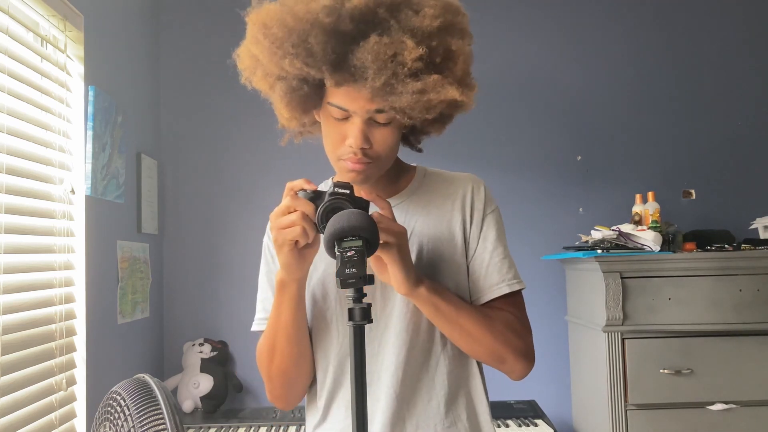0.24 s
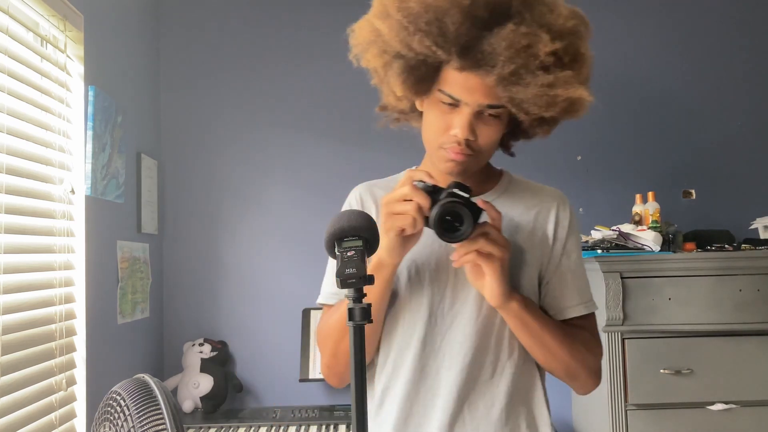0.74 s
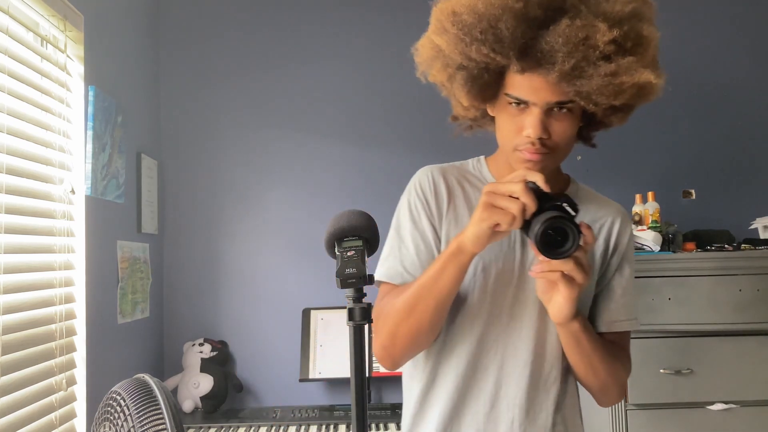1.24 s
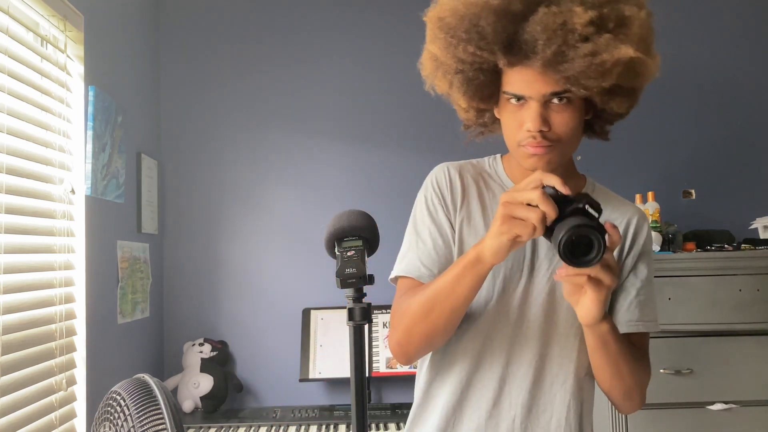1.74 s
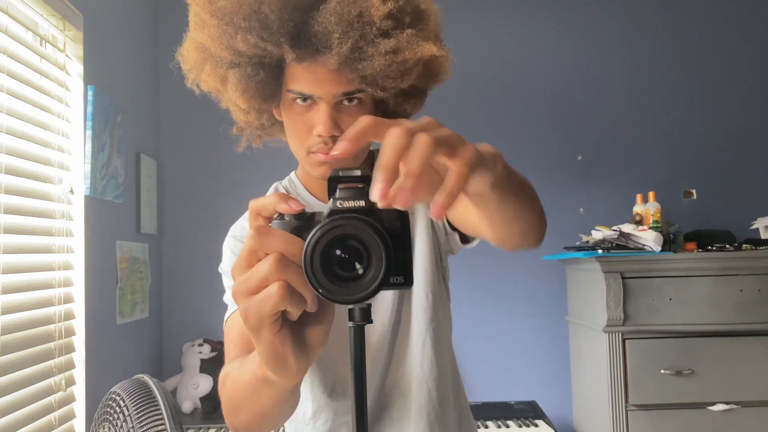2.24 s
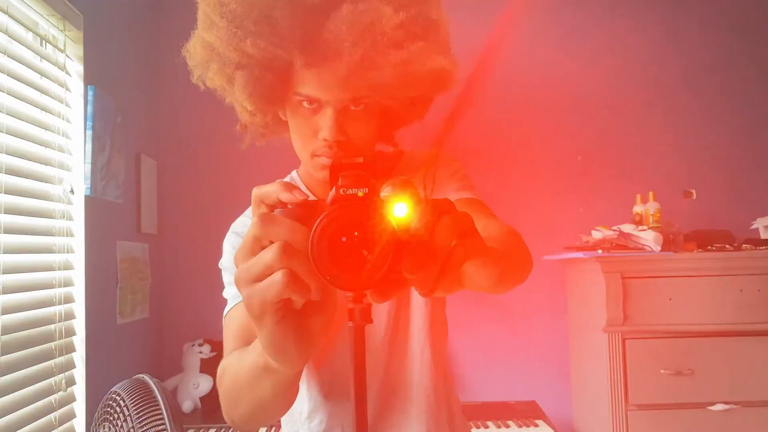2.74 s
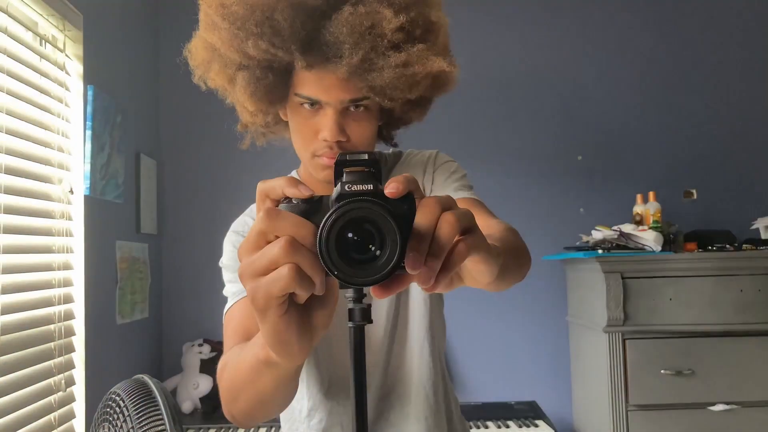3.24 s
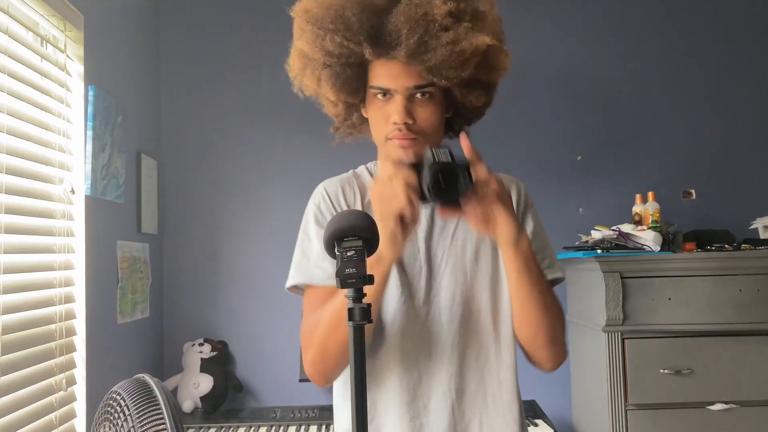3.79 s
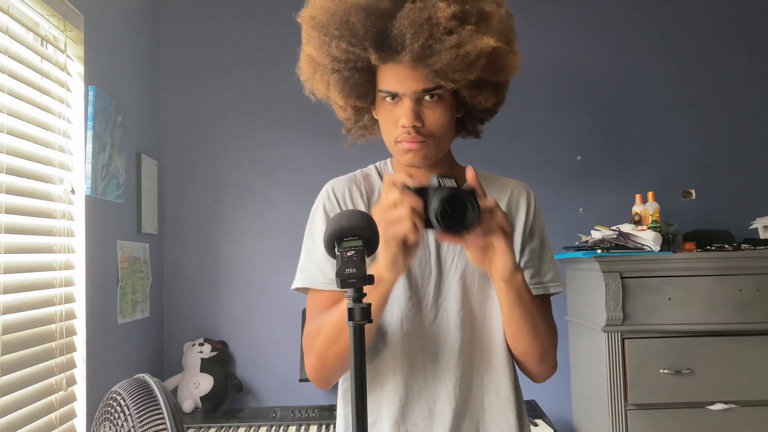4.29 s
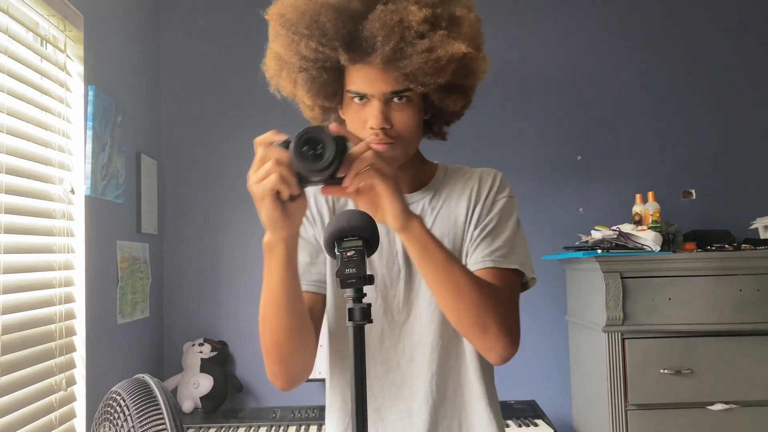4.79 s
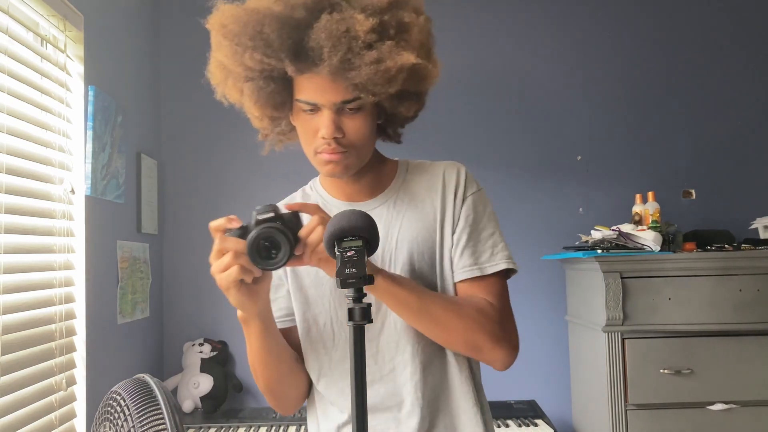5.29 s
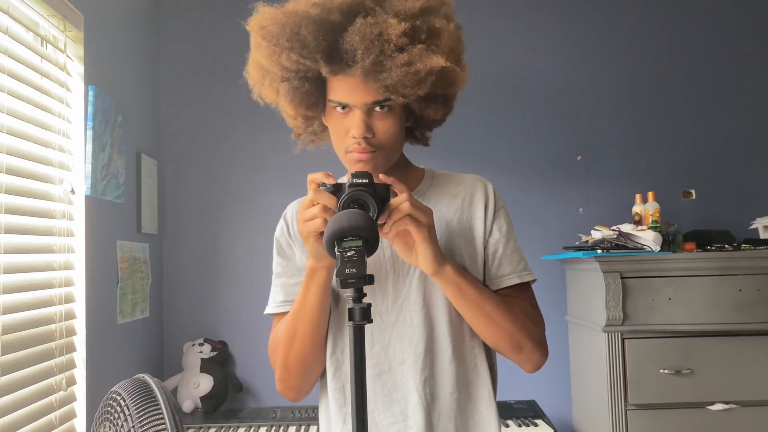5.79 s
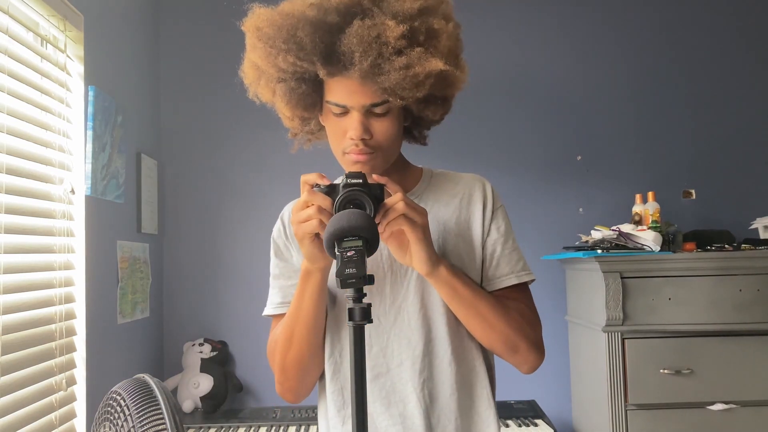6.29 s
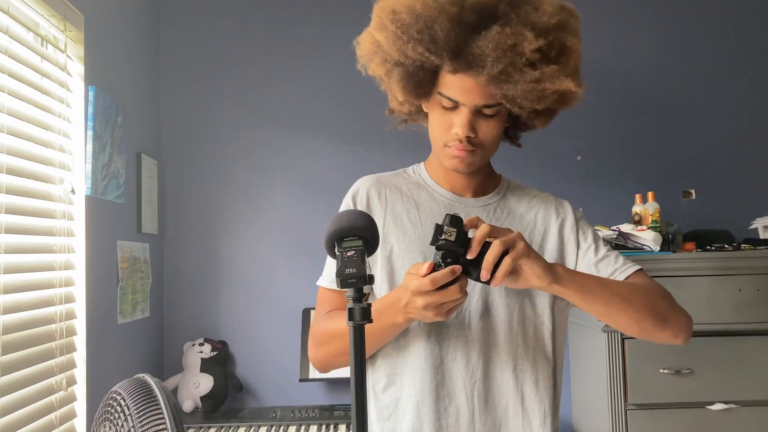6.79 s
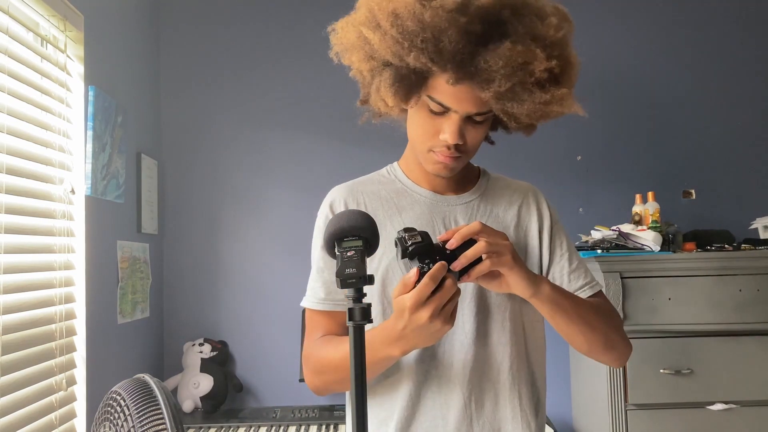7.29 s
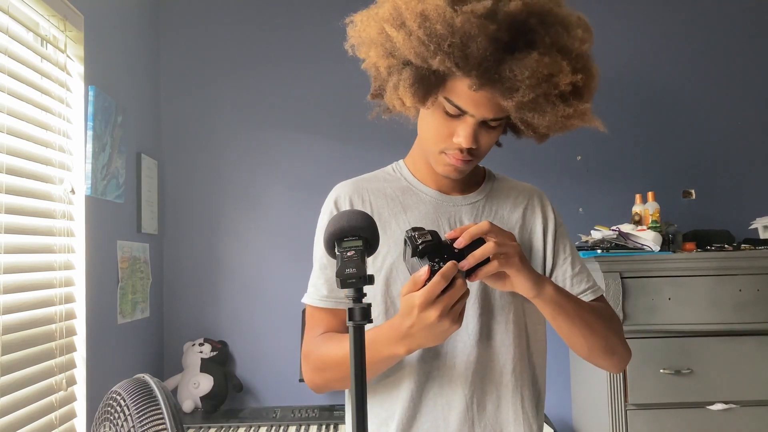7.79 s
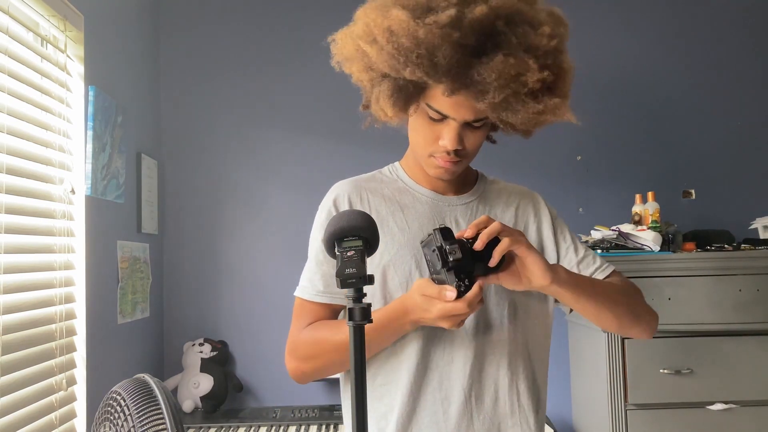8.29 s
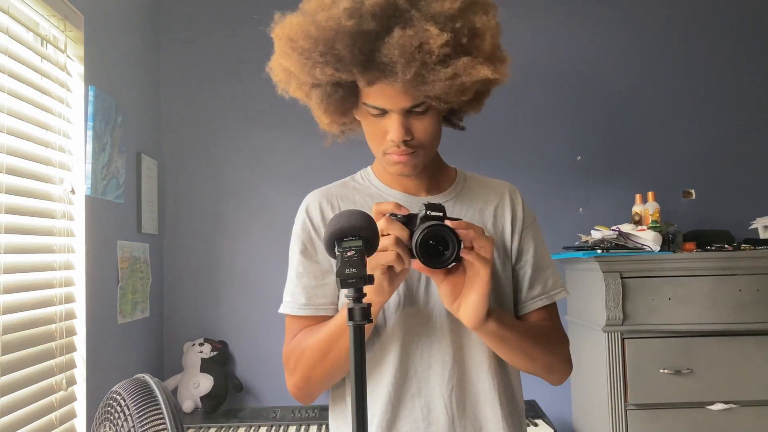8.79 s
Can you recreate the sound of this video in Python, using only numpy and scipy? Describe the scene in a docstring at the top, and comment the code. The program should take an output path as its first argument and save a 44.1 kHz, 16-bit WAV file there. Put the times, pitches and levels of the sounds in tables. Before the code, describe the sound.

Dry, bright shutter clacks come first loud and near, then softer and more distant, with light button ticks between them. After a small plastic clap, a rattling run of about sixteen frames passes very near the microphone. Several separate shots follow, then handling: clicking hinge, skin squeaks, hollow knocks and a hard clap with rebounds. A short burst ends it. The small room gives brief diffuse echo above soft air noise and faint cloth rustle.

```python
"""Small camera in a quiet bedroom

A small camera is fired near a microphone, in single shots and bursts of ten frames a second.
Each shot slams the shutter blades shut, a geared motor recocks them and a latch drops; then they snap open.
Impacts are decaying noise and struck modes, gears are modulated noise, and buttons and plastic are filtered
contacts. Fingers rub by stick-slip, sleeves rustle, a faint hum comes and goes, and the room echoes diffusely."""
import sys
import numpy as np
from scipy import signal
from scipy.fft import rfft, irfft, next_fast_len
from scipy.io import wavfile
from scipy.ndimage import map_coordinates

SR = 44100
rng = np.random.default_rng(int(sys.argv[2]) if len(sys.argv) > 2 else 0)


def digitize_waveform(pressure):
    """Quantize a signal to 16-bit integers and store it at the path in sys.argv[1].

    Rows of a 2-D input are taken as channels; values are limited to [-1, 1].
    """
    field = np.atleast_2d(pressure).T
    bounded = np.clip(field, -1, 1)
    quanta = np.round(bounded * 32767).astype(np.int16)
    wavfile.write(sys.argv[1], SR, quanta)


N = 398663
T = np.arange(SR // 8) / SR  # time within one short sound, seconds


def amp(db):
    """Level law: decibels to an amplitude ratio."""
    return 10 ** (np.asarray(db) / 20)


def unit(x):
    """Normalisation: scales to a root-mean-square of 1."""
    return x / np.sqrt(np.mean(x ** 2) + 1e-20)


def along(points, hz):
    """Logarithmic frequency scale: interpolates (Hz, value) points on it."""
    point_hz, values = np.transpose(points)
    return np.interp(np.log(hz + 1), np.log(point_hz + 1), values)


def wobble(rate, size):
    """Slow random modulation: a smooth curve through random knots, rate of them a second."""
    knots = rng.standard_normal(size // 8)
    return map_coordinates(knots, [np.arange(size) * rate / SR], mode="mirror")


def noise(alike, size):
    """Partial coherence: mid and side noise mixed so the channels have a given likeness by frequency."""
    likeness = along(alike, np.fft.rfftfreq(size, 1 / SR))
    turn = np.arccos(np.clip(likeness, -1, 1)) / 2
    mid_side = rfft(rng.standard_normal((2, size)))
    mid, side = irfft(mid_side * [np.cos(turn), np.sin(turn)], size)
    return np.array([mid + side, mid - side])


def coloured(x, spectrum, treble_db=0, keep_power=True):
    """Minimum-phase filtering: a causal filter of the given spectrum, tilted by treble_db."""
    size = 2 * next_fast_len(x.shape[-1] // 2 + 1024)
    hz = np.fft.rfftfreq(size, 1 / SR)
    tilt = along([(2500, -.5), (10000, .5)], hz)
    gain = amp(along(spectrum, hz) + treble_db * tilt)
    if keep_power:
        gain = unit(gain)
    # folding the cepstrum onto positive time makes the filter causal
    cepstrum = irfft(np.log(gain + 1e-6))
    cepstrum[1:size // 2] *= 2
    cepstrum[size // 2 + 1:] = 0
    return irfft(rfft(x, size) * np.exp(rfft(cepstrum)), size)[..., :x.shape[-1]]


def add(track, s, sound, pan_db=0):
    """Superposition: lays a sound into a stereo track at s seconds, left over right by pan_db."""
    start = round(s * SR)
    panned = sound * amp([[pan_db / 2], [-pan_db / 2]])
    part = panned[:, max(-start, 0):max(N - start, 0)]
    track[:, max(start, 0):][:, :part.shape[1]] += part


# Spectrum of the still air. Each row: frequency in Hz, relative density in dB per Hz.
AIR_SPECTRUM = [(20, 0), (60, 0), (110, -5), (160, -8), (320, -8.5), (450, -13.5), (750, -27), (1000, -24),
                (1300, -29), (1600, -26), (2500, -35), (6000, -36), (11000, -42), (16000, -48)]
# Coherence of the still air. Each row: frequency in Hz, likeness of left and right from 0 to 1.
AIR_LIKENESS = [(60, 0.29), (240, 0.32), (950, 0.28), (3770, 0.16), (15000, 0.07)]
# Spells in which the hum swells. Each row: start in seconds, end in seconds, added level in dB.
HUM_SPELLS = [(.65, 1.78, -56), (1.48, 1.72, -53), (3.8, 4.95, -53), (7.2, 9.1, -55.5)]
# Course of the low drone. Each row: time in seconds, level in dB.
DRONE_LEVELS = [(0, -65), (2.3, -63), (2.9, -57), (5.2, -56), (6.5, -58), (7.2, -62), (9.04, -61)]
AIR_DB, HUM_REST_DB, HUM_FADE_S = -50, -65, .14


def background(hum_hz=107.7, drone_hz=57.3):
    """Steady room noise: coloured air noise plus two tones with slight random frequency modulation."""
    t = np.arange(N) / SR
    air = coloured(noise(AIR_LIKENESS, next_fast_len(N))[:, :N], AIR_SPECTRUM)
    sound = amp(AIR_DB) * unit(air)
    hum = np.full(N, amp(HUM_REST_DB))
    for start, end, db in HUM_SPELLS:
        hum += amp(db) * np.clip(.5 + np.minimum(t - start, end - t) / HUM_FADE_S, 0, 1)
    drone = amp(np.interp(t, *np.transpose(DRONE_LEVELS)))
    for hz, level, waver_hz, lead in ((hum_hz, hum, 1.5, 1.7), (drone_hz, drone, 3, 1.2)):
        phase = 2 * np.pi * np.cumsum(hz + waver_hz * wobble(7, N)) / SR
        # standing waves: the phase differs between left and right by lead, in radians
        sound = sound + level * np.sqrt(2) * np.sin([phase, phase + lead])
    return sound


# Spectrum of sleeves and arms. Each row: frequency in Hz, relative density in dB per Hz.
RUSTLE_SPECTRUM = [(100, -15), (500, 0), (1300, -2), (3000, -11), (10000, -17), (16000, -25)]
RUSTLE_DB = -67


def sleeves(rate_hz=9, swing_db=3):
    """Cloth friction: the moving arms make a faint noise of randomly varying level."""
    level = amp(RUSTLE_DB + swing_db * wobble(rate_hz, N))
    return level * coloured(noise(AIR_LIKENESS, next_fast_len(N))[:, :N], RUSTLE_SPECTRUM)


# Reverberation of the bedroom. Each row: frequency in Hz, time to decay by 60 dB in seconds.
ROOM_DECAY = [(200, 0.04), (550, 0.4), (1400, 0.29), (4000, 0.32), (9000, 0.28), (15000, 0.39)]
# Colour of the reverberation. Each row: frequency in Hz, gain in dB.
ROOM_GAIN = [(150, -5.5), (480, 0), (900, -.5), (1700, 1), (3000, -1), (5500, -.5), (10000, -2.5),
             (15000, -4)]


def room(x, delay=.004, blur_octaves=.16):
    """Diffuse reverberation: each band stores the energy it is fed and loses it exponentially."""
    hz, t, z = signal.stft(x, SR, nperseg=256)
    octave = np.log2(hz + 100)
    blur = np.exp(-((octave[:, None] - octave) / blur_octaves) ** 2 / 2)
    fed = (blur / blur.sum(axis=1, keepdims=True)) @ np.mean(np.abs(z) ** 2, axis=0)
    kept = amp(-60 * t[1] / along(ROOM_DECAY, hz)) ** 2  # share of energy left after each step
    stored = np.array([signal.lfilter([1 - k], [1, -k], band) for k, band in zip(kept, fed)])
    diffuse = noise([(150, .7), (800, .3), (4000, .1)], next_fast_len(N))[:, :N]
    grain = signal.stft(diffuse, SR, nperseg=256)[2]
    tail = grain / np.std(grain) * np.sqrt(stored) * amp(along(ROOM_GAIN, hz))[:, None]
    wet = np.zeros((2, N))
    add(wet, delay, signal.istft(tail, SR, nperseg=256)[1])
    return wet


# Coherence of nearby sounds. Each row: frequency in Hz, likeness of left and right from 0 to 1.
NEAR_LIKENESS = [(300, .92), (3000, .9), (8000, .85), (14000, .55)]


def chatter(t60, ring_db=-24, ring_t60=.05):
    """Dense modal decay: noise of countless small modes that die fast, outlasted by a weaker second decay."""
    decay = amp(-60 * T / t60) + amp(ring_db - 60 * T / ring_t60)
    return noise(NEAR_LIKENESS, len(T)) * decay


def ring(modes, scatter_db=2):
    """Modal synthesis: decaying sinusoids, struck at new strengths and phases every time."""
    hz, db, life = np.transpose(modes)[:, :, None]
    strength_db = db + rng.normal(0, scatter_db, hz.shape)
    swell = 1 - np.exp(-T * hz / .8)  # low modes need about a cycle to build up
    phase = 2 * np.pi * (hz * T + rng.random(hz.shape))
    return np.sum(amp(strength_db - 60 * T / life) * swell * np.sin(phase), axis=0)


def stroke(length, size=len(T)):
    """Contact pressure: a finger presses, holds and lets go over length seconds."""
    progress = np.minimum(np.arange(size) / SR / length, 1)
    return np.sqrt(np.abs(np.sin(np.pi * progress)))


# Rubs on the shell. Each row: start in seconds, length in seconds, level in dB, centre frequency in Hz.
FINGER_RUBS = [(2.06, .025, -51, 1400), (6.826, .145, -38.5, 900), (6.83, .14, -50, 4000),
               (6.89, .08, -43, 1250), (7.32, .24, -46, 550), (7.39, .1, -46, 4300), (7.45, .08, -46, 1100),
               (7.6, .06, -42, 1100), (7.61, .05, -50, 5500), (7.715, .08, -53, 900),
               (8.075, .03, -42, 1000)]
# Band of a rub. Each row: multiple of the centre frequency [ratio], relative level in dB.
FRICTION_BAND = [(.1, -34), (.35, -9), (.6, -2), (1, 0), (1.35, -2), (1.9, -14), (3, -24), (12, -42)]
HANDS_PAN_DB = -7.5  # the camera is handled to the right of the microphone


def fingers(grain_hz=350, grain_db=4, grip_hz=60, grip_db=3.5, size=SR // 4):
    """Stick-slip friction: skin catches and slips on the shell in short strokes of uneven grip."""
    track = np.zeros((2, N))
    for s, length, db, hz in FINGER_RUBS:
        unevenness_db = grain_db * wobble(grain_hz, size) + grip_db * wobble(grip_hz, size)
        slips = unit(amp(unevenness_db)) * stroke(length, size)
        band = [(hz * ratio, level) for ratio, level in FRICTION_BAND]
        add(track, s, amp(db) * coloured(slips * noise(NEAR_LIKENESS, size), band), HANDS_PAN_DB)
    return track


def creak(s=7.315, length=.07, start_hz=190, end_hz=270, db=-44, centre_hz=1450, rough=.4):
    """Regular stick-slip: a fingertip slips at a quickening, almost even rate."""
    track = np.zeros((2, N))
    turns = np.cumsum(np.interp(T, [0, length], [start_hz, end_hz])) / SR
    pulses = unit(np.diff(np.floor(turns), prepend=0))  # one pulse at each whole turn
    slips = pulses + rough * noise(NEAR_LIKENESS, len(T))
    band = [(centre_hz * ratio, level) for ratio, level in FRICTION_BAND]
    add(track, s, amp(db) * coloured(slips * stroke(length), band), pan_db=-7)
    return track


def plastic(table, t60, ring_db, bass_db, top_db):
    """Contact spectrum: a hollow knock of the shell, a clack and a bright snap shape decaying noise."""
    track = np.zeros((2, N))
    for s, knock_db, clack_db, snap_db, pan_db in table:
        spectrum = [
            (70, knock_db + bass_db), (230, knock_db - 6), (450, knock_db),
            (800, (knock_db + clack_db) / 2), (1400, clack_db + 2),
            (2800, (clack_db + snap_db) / 2 - 1), (6000, snap_db), (15000, snap_db + top_db)]
        contact = chatter(t60, ring_db, ring_t60=.06)
        add(track, s, coloured(contact, spectrum, keep_power=False), pan_db)
    return track


def contacts(rows, colour):
    """Spectral shape: gives (s, dB) contacts one plastic colour, where the hands hold the camera."""
    return [(s, *(db + np.array(colour)), HANDS_PAN_DB) for s, db in rows]


# Bright snaps: a hinge clicks through its detents, and the last row is a very faint snap that
# leads into the final clap. Each row: time in seconds, level in dB.
BRIGHT_SNAPS = [(6.6618, -12.5), (6.6855, -14), (6.6997, -16.5), (6.7237, -7), (6.7283, -12), (6.7358, -15),
                (6.746, -18), (6.858, -21), (6.8743, -22), (7.6488, -18), (8.3705, -28)]
# Knocks of fingers on the shell. Each row: time in seconds, level in dB.
FINGER_KNOCKS = [(6.708, -12), (6.858, -18), (6.8743, -10), (6.8795, -13), (6.895, -11), (6.911, -14),
                 (7.2915, -15.5), (7.5069, -8), (7.582, -13), (7.628, -17), (7.6845, -19), (7.7065, -9.5),
                 (7.8605, -26), (7.992, -29)]
# Claps of hinged parts. Each row: time in seconds, then knock, clack, snap and left over right in dB.
HINGE_CLAPS = [(3.6326, -21, 1.5, -10, -1), (8.1024, 8, 2, -2.5, -8), (8.1075, 4.5, 0, -4, -6),
               (8.3756, -13.5, -5, -3.5, -7)]
# First rebound of the hardest clap. A single row: time in seconds, level in dB.
FIRST_REBOUND = (8.12, -7)
REBOUND_GAP_S, REBOUND_LOSS_DB = .0095, 1.5  # from one rebound to the next
# Plastic colours of a bright snap and of a knock. Each row: knock, clack and snap in relative dB.
SNAP_SHAPE = (-16, -7, 0)
KNOCK_SHAPE = (0, -7, -21)
# Modes of the hollow shell. Each row: frequency in Hz, relative level in dB, 60 dB decay in seconds.
SHELL_MODES = [(185, -8, .05), (285, -7, .05), (385, 2, .04), (490, 1, .038), (660, 2.5, .03)]


def handling(count=3):
    """Impact and rebound: snaps, knocks and claps, with evenly weakening rebounds of the hardest clap."""
    first_s, first_db = FIRST_REBOUND
    rebounds = [(first_s + k * REBOUND_GAP_S, first_db - k * REBOUND_LOSS_DB) for k in range(count)]
    snaps = contacts(BRIGHT_SNAPS, SNAP_SHAPE)
    knocks = contacts(FINGER_KNOCKS + rebounds, KNOCK_SHAPE)
    rows = snaps + knocks + HINGE_CLAPS
    track = plastic(rows, t60=.016, ring_db=-21, bass_db=-15, top_db=-16)
    for s, knock_db, _, _, pan_db in rows:
        add(track, s, amp(knock_db - 29) * ring(SHELL_MODES), pan_db)  # every contact also thumps the shell
    return track


# Spectrum of gears and catches. Each row: frequency in Hz, relative density in dB per Hz.
GEAR_SPECTRUM = [(60, -18), (200, -8.5), (380, -1), (700, -7.5), (1800, 0), (3000, -2.5), (4100, 2),
                 (6000, 1), (10000, -2), (13000, -11), (16000, -20)]
# The raised flash is clapped down. A single row: time in seconds, level in dB.
FLASH_CLAP = (3.6328, -14)
# Modes of the flash housing. Each row: frequency in Hz, relative level in dB, 60 dB decay in seconds.
FLASH_MODES = [(1200, -7, .025), (1330, -2, .03), (1556, -4, .022), (1860, -1, .028), (2020, -3, .028),
               (2240, -9, .03), (3690, -14, .04)]


def flash(echo_db=-29, echo_t60=.17):
    """Struck resonator: the flash claps shut with a woody ring; a bright, diffuse echo dies away in the room."""
    track = np.zeros((2, N))
    s, db = FLASH_CLAP
    add(track, s, amp(db) * ring(FLASH_MODES, scatter_db=1), pan_db=-1.5)
    echo = coloured(chatter(echo_t60), GEAR_SPECTRUM, treble_db=-6)
    add(track, s + .004, amp(echo_db) * echo)
    return track


# The camera as it is moved about the microphone. Each row: time in seconds,
# then nearness, shell thud, treble and left over right in dB.
CAMERA_PATH = [(.1, -10, -31, 4.5, 1), (.5, -11.5, -31.5, 1, .5), (.95, -13.5, -34, 3.5, -8),
               (1.35, -17.6, -39, 1.5, -10), (1.8, -19.8, -42, 2, -11), (2.55, -21.3, -47, .5, .5),
               (3.47, -22.3, -47, .5, 1), (3.85, -14, -33.5, -2, -10), (4.24, -12.7, -32.5, -2.5, -8.5),
               (4.46, -7.5, -33, 2.5, -3.5), (4.9, -6, -34, 4, 4), (5.15, -9.7, -35.5, 7, 5.5),
               (5.37, -9.2, -34.5, 6, 3.5), (5.6, -11, -32.5, 2, -.5), (6.28, -11.5, -33, 2, 0),
               (6.5, -11.5, -31.5, -1.5, 0), (8.63, -10.5, -30.5, -1.5, -6), (9.04, -9, -30, -1, -5)]


def camera_at(s):
    """Source position: nearness, thud, treble and left-right dB of the camera at s seconds."""
    times, *columns = np.transpose(CAMERA_PATH)
    return [np.interp(s, times, column) for column in columns]


# Light ticks of the half-pressed button and the lens. Each row: time in seconds, level in dB.
LIGHT_TICKS = [(.3095, -21), (.659, -37), (.6929, -15), (.7825, -19), (1.172, -26), (2.3535, -34),
               (3.7955, -20)]
# Presses of the release. Each row: first blow in seconds, frames [count], button lead in seconds,
# flash raised [0 or 1].
RELEASES = [(.0527, 2, .041, 0), (.3977, 1, .042, 0), (.9536, 1, .038, 0), (1.2295, 3, .037, 0),
            (1.6721, 1, .035, 0), (2.5655, 1, .041, 1), (2.8503, 1, .041, 1), (3.1419, 1, .041, 1),
            (3.3839, 1, .057, 1), (3.8527, 16, .043, 0), (5.5685, 1, .04, 0), (5.8196, 2, .04, 0),
            (6.1563, 1, .035, 0), (6.3934, 1, .036, 0), (8.6375, 5, .041, 0)]
# Plastic colours of the release and of a tick. Each row: knock, clack and snap in relative dB.
BUTTON_SHAPE = (-10, -7, 0)
TICK_SHAPE = (-17, 0, -9)
BUTTON_DB, FLASH_SOFTER_DB = -9.5, -6  # relative to nearness; change while the flash is raised


def buttons():
    """Snap contact: the release clicks once before each single shot or burst; lighter ticks come in between."""
    rows = [(s, *(db + np.array(TICK_SHAPE)), camera_at(s)[-1]) for s, db in LIGHT_TICKS]
    for s, _, lead_s, flash_up in RELEASES:
        near_db, _, _, pan_db = camera_at(s)
        db = near_db + BUTTON_DB + flash_up * FLASH_SOFTER_DB
        rows.append((s - lead_s, *(db + np.array(BUTTON_SHAPE)), pan_db))
    return plastic(rows, t60=.013, ring_db=-22, bass_db=-15, top_db=-13)


def pawl(t60):
    """Light metal impact: a catch trips with a short bright burst."""
    return coloured(chatter(t60), GEAR_SPECTRUM, treble_db=1.5)


CATCH_DB, LATCH_DB = -18, -12.5  # relative to nearness


def add_catch(track, s):
    """Stored energy released: a catch trips and lets the blades go."""
    near_db, _, _, pan_db = camera_at(s)
    add(track, s, amp(near_db + CATCH_DB) * pawl(t60=.021), pan_db)


def gears(shape, tooth_hz=900, rough_db=2.3):
    """Tooth-mesh modulation: gears whirr as noise whose level varies randomly at about the tooth rate."""
    level_db = np.interp(T, *np.transpose(shape), right=-120)
    teeth = unit(amp(rough_db * wobble(tooth_hz, len(T))))
    return amp(level_db) * teeth * noise(NEAR_LIKENESS, len(T))


# Gear noise as the motor recocks. Each row: seconds after the closing blow, relative level in dB.
RECOCK_SHAPE = [(.012, -31), (.018, -7.5), (.023, 2), (.027, 0), (.031, -2.5), (.036, 3), (.042, -5.5),
                (.047, -6), (.055, -12), (.068, -33)]
MOTOR_DB = -15.3  # relative to nearness


def add_recock(track, s):
    """Spring winding: after the blades close the motor winds the springs, until the latch drops."""
    near_db, _, _, pan_db = camera_at(s)
    whirr = coloured(gears(RECOCK_SHAPE), GEAR_SPECTRUM)
    add(track, s, amp(near_db + MOTOR_DB) * whirr, pan_db * .8)
    add(track, s + .058, amp(near_db + LATCH_DB) * pawl(t60=.016), pan_db * .8)


# Gear noise before the blades are freed. Each row: seconds before the opening blow, relative level in dB.
RUN_UP_SHAPE = [(.002, -26), (.012, -6.5), (.018, -1), (.022, -2), (.026, 5), (.032, -5), (.046, -8),
                (.054, -30)]
RUN_UP_DB = -22  # relative to nearness


def add_run_up(track, s, db):
    """Geared drive: the motor turns on until it frees the blades at s seconds."""
    near_db, _, _, pan_db = camera_at(s)
    whirr = gears(RUN_UP_SHAPE)[:, ::-1]  # the table counts backwards from the blow
    add(track, s - len(T) / SR, amp(near_db + db) * coloured(whirr, GEAR_SPECTRUM), pan_db * .8)


BLADE_SKID_S = .0012  # the blades scrape home for this long before the blow dies away
SAME_SHARE = .4  # share of the chatter's power that is alike from shot to shot


def skid(t60, pattern):
    """Sliding impact: the blades scrape home partly alike each time, then chatter dies and a weak ring stays."""
    grain = np.sqrt(SAME_SHARE) * pattern + np.sqrt(1 - SAME_SHARE) * noise(NEAR_LIKENESS, len(T))
    decay = amp(-60 * np.maximum(T - BLADE_SKID_S, 0) / t60)
    return grain * (decay + amp(-27 - 60 * T / .04))


# Spectrum of the blades' impact. Each row: frequency in Hz, relative density in dB per Hz.
BLADE_SPECTRUM = [(60, -22.5), (200, -15), (400, -9), (900, -7), (1800, -3), (3000, -5), (4200, -1),
                  (6000, 1.5), (8000, -2), (10000, -2), (13000, -8), (16000, -14)]
# Modes of the shutter frame, and hollow modes added while the flash is raised.
# Each row: frequency in Hz, relative level in dB, 60 dB decay in seconds.
FRAME_MODES = [(1020, -25, .03), (1480, -23, .028), (1700, -16.5, .035), (2250, -19.5, .025),
               (2700, -18, .022), (3930, -15, .028), (5830, -15, .02), (6150, -16, .02), (7090, -18, .02),
               (9720, -18, .02)]
RAISED_FLASH_MODES = [(1480, -11, .025), (1600, -8, .028), (1720, -12, .03)]
# The microphone swells the bass of very close blows. Each row: frequency in Hz, level in dB at
# 0 dB nearness, 60 dB decay in seconds.
BOOM_MODES = [(150, -5, .045), (205, -5, .04)]
BOOM_GROWS = 4  # dB per dB of nearness


def add_blow(track, s, kind, flash_up):
    """Impact excitation: the blades skid, hit their stop, ring their frame and thump the shell."""
    near_db, thud_db, treble_db, pan_db = camera_at(s)
    force_db, thump_db, bright_db, t60, frame_db, pattern = kind
    db = near_db + force_db
    add(track, s - .0012, amp(db - 17) * pawl(t60=.012), pan_db)
    impact = amp(-1.3) * skid(t60, pattern) + amp(-6) * chatter(t60=.004, ring_db=-60)
    struck = coloured(impact, BLADE_SPECTRUM, treble_db + bright_db)
    ringing = amp(frame_db) * ring(FRAME_MODES) + flash_up * ring(RAISED_FLASH_MODES)
    add(track, s, amp(db) * (struck + ringing), pan_db)
    thump = amp(thud_db + thump_db) * ring(SHELL_MODES)
    boom = amp(BOOM_GROWS * near_db) * ring(BOOM_MODES)
    add(track, s + .0005, thump + boom, pan_db - 3)


# The four blows of the blades. Each row: level in dB, thud in dB, treble tilt in dB,
# 60 dB decay in seconds, frame ring in dB; all dB are relative.
CLOSE_FIRST = (-2.5, 1, -7.5, .017, 0)
OPEN_IN_BURST = (0, -2, 2, .016, -3)
CLOSE_IN_BURST = (-1.3, 0, -5, .015, -6)
OPEN_LAST = (-1, -1, 1.2, .018, 3.5)
FRAME_S, OPEN_S = .1, .0082  # closing to closing; how long the blades stand open before a further closing
REOPEN_S, REOPEN_FLASH_S = .136, .0878  # last closing to final opening, with flash down and raised


def shutter():
    """Cyclic mechanism: blades close, reopen and close for each further frame, and open at the end."""
    track = np.zeros((2, N))
    kinds = (CLOSE_FIRST, OPEN_IN_BURST, CLOSE_IN_BURST, OPEN_LAST)
    # each kind of blow keeps one noise pattern, which its repeats share
    patterned = [(*kind, noise(NEAR_LIKENESS, len(T))) for kind in kinds]
    first_close, burst_open, burst_close, last_open = patterned
    for start, frames, _, flash_up in RELEASES:
        closings = start + FRAME_S * np.arange(round(frames))
        add_catch(track, start - .0046)
        add_blow(track, start, first_close, flash_up)
        for s in closings[1:]:
            add_catch(track, s - OPEN_S - .008)
            add_blow(track, s - OPEN_S, burst_open, flash_up)
            add_blow(track, s, burst_close, flash_up)
        for s in closings:
            add_recock(track, s)
        end = closings[-1] + (REOPEN_FLASH_S if flash_up else REOPEN_S)
        add_run_up(track, end, RUN_UP_DB + flash_up * FLASH_SOFTER_DB)
        add_catch(track, end - .008)
        add_blow(track, end, last_open, flash_up)
    return track


# Resonances through which the whole mechanism sounds. Each row: frequency in Hz, width in Hz, level in dB.
HOUSING_RESONANCES = [(365, 50, -4.5), (495, 50, -7), (690, 120, -11), (890, 60, -7), (1700, 150, -8),
                      (2250, 120, -11), (2650, 220, -6), (3930, 100, -4), (4060, 80, -5), (4650, 200, -11),
                      (5780, 650, -5), (7090, 60, -6), (8850, 250, -11), (9720, 90, -7), (10500, 250, -9),
                      (13250, 700, -8)]


def housing(x):
    """Resonant transmission: the direct sound plus band-pass resonances of the housing."""
    size = next_fast_len(N + SR // 2)
    f = np.fft.rfftfreq(size, 1 / SR)
    response = 1
    for hz, width, db in HOUSING_RESONANCES:
        damping = 1j * f * width
        response = response + amp(db) * damping / (hz ** 2 - f ** 2 + damping)
    return irfft(rfft(x, size) * response, size)[:, :N]


# echo gain of the camera at 0 dB nearness, dB it gains per dB of distance, and echo gain of the handling
WET_DB, WET_GROWS, HANDLING_WET_DB = -20.5, .8, -11.8


def scene():
    """Direct and reverberant field: the camera's echo is a larger share the farther it is."""
    camera = amp(-.8) * housing(shutter()) + buttons()
    hands = handling() + flash() + fingers() + creak()
    wet_db = WET_DB - WET_GROWS * camera_at(np.arange(N) / SR)[0]
    echo = room(amp(wet_db) * camera + amp(HANDLING_WET_DB) * hands, blur_octaves=.08)
    return camera + hands + echo + sleeves() + background()


TOP_HZ = 16000  # upper band limit


def record(dry):
    """Saturation and band limiting: loud peaks clip softly, and the top falls 1 dB per 20 Hz, by up to 90 dB."""
    clipped = dry / (1 + np.abs(dry) ** 6) ** (1 / 6)
    size = next_fast_len(N + SR // 2)
    loss_db = np.clip((np.fft.rfftfreq(size, 1 / SR) - TOP_HZ) / 20, 0, 90)
    return irfft(rfft(clipped, size) * amp(-loss_db), size)[:, :N]


dry = scene()
out = record(dry)
digitize_waveform(out)
```